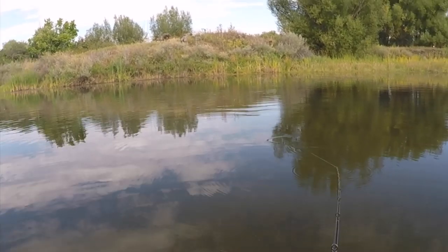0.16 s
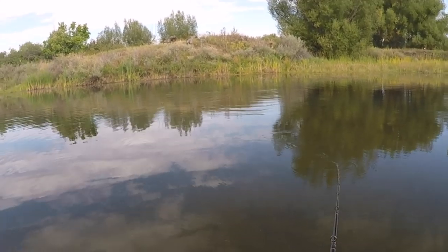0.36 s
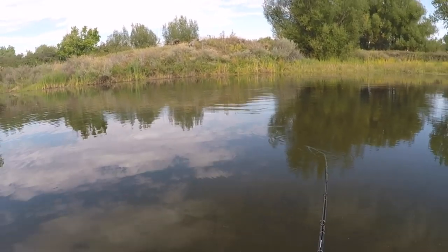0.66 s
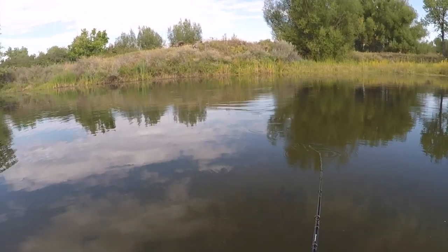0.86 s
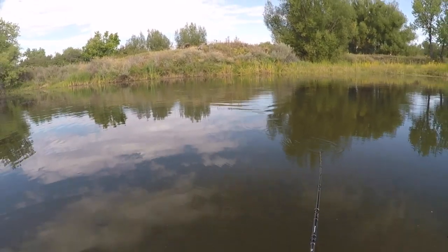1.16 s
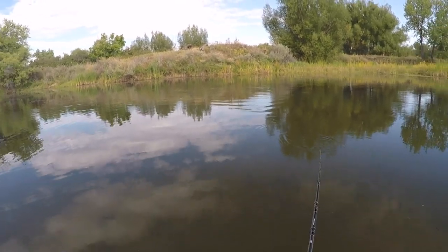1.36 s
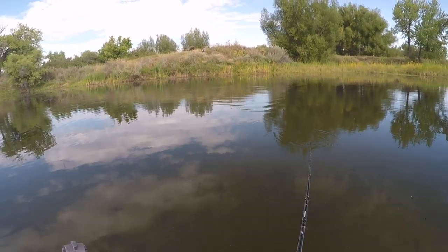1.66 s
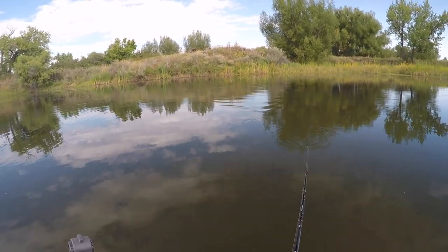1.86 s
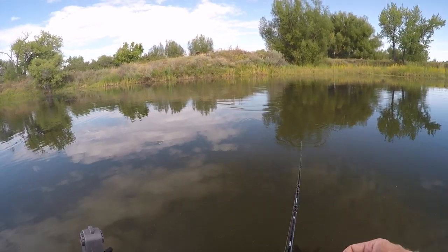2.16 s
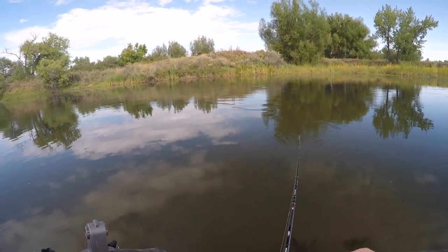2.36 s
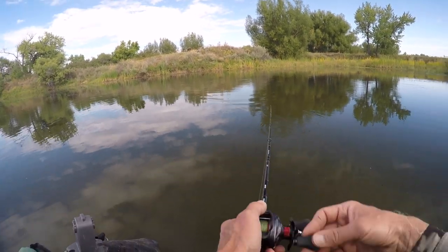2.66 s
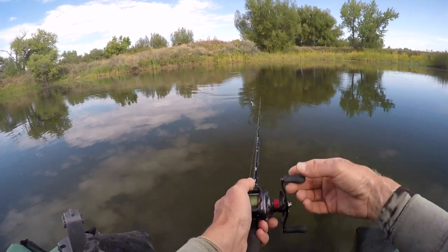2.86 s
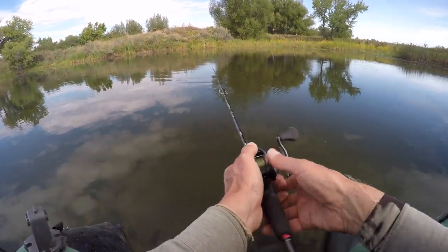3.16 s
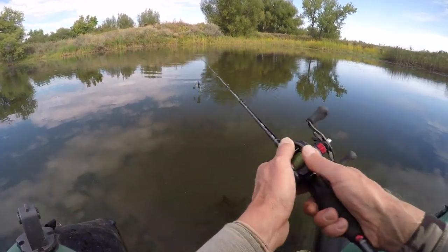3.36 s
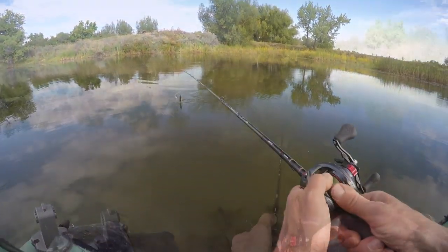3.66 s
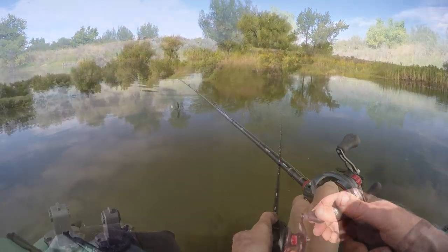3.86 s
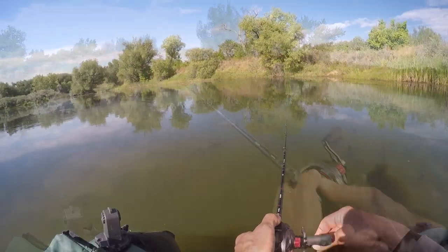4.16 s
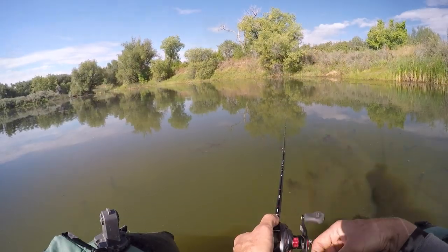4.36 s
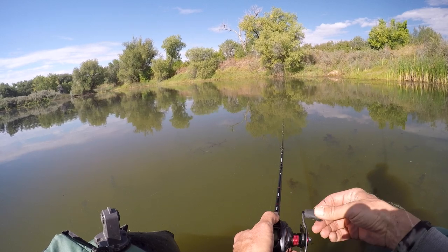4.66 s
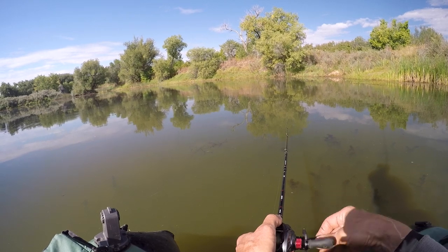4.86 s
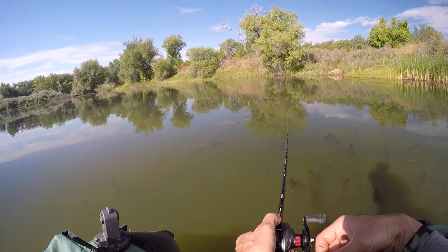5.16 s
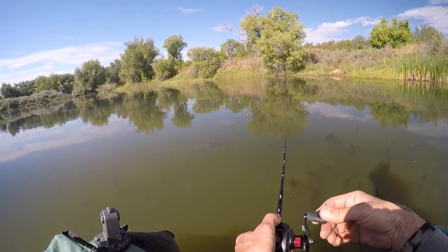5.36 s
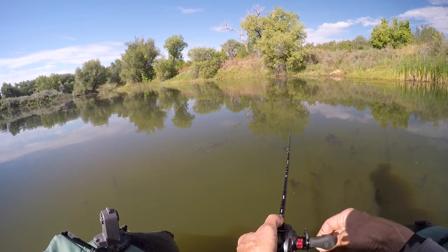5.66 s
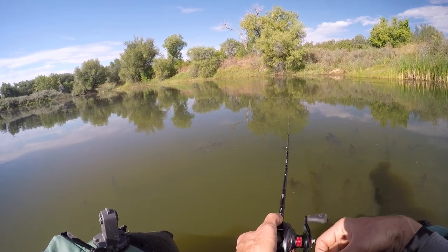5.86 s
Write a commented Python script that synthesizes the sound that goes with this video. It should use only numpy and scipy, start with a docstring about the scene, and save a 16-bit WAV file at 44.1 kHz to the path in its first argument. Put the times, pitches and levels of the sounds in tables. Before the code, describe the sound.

Close on a small boat on an open pond, an electric motor hums low and steady, with uneven buzzing rattles from the hull and loose fittings. A thin squeak sags in pitch near the start. After four seconds the motor stops abruptly, leaving soft low air and water noise, light hiss, and a fishing reel turned in gentle pushes with small scrapes, ticks and dull bumps.

```python
"""A small electric boat motor hums through the hull on a pond: a wavering harmonic tone, under resonant
rattles struck in the same limping pattern every shaft turn. A thin squeak sags in pitch near the start.
At four seconds the hum stops dead, leaving filtered noise as air and water, a faint drone and hiss.
A fishing reel is then cranked in pushes of gear noise, with soft sine bumps, light scrapes and ticks."""
import sys
import numpy as np
from scipy import signal
from scipy.fft import rfft, irfft
from scipy.io import wavfile
from scipy.ndimage import map_coordinates

SR = 44100
rng = np.random.default_rng(int(sys.argv[2]) if len(sys.argv) > 2 else 0)


def inscribe(sig):
    """Save sig as 16-bit PCM at rate SR to the path in sys.argv[1].

    A 1-D sig is mono; a 2-D sig holds one channel per row.
    Samples are clipped to [-1, 1] before scaling.
    """
    pcm = np.round(np.clip(np.atleast_2d(sig).T, -1, 1) * 32767)
    wavfile.write(sys.argv[1], SR, pcm.astype(np.int16))


N = 265041
T = np.arange(N) / SR
STOP_S = 4.003  # the motor ends
BEAT_HZ, BEATS_PER_TURN = 81.745, 4  # settled beat rate of the motor


def amp(db):
    """Decibels to gain."""
    return 10 ** (np.asarray(db) / 20)


def unit(x):
    """Scales to rms 1."""
    return x / np.sqrt(np.mean(x ** 2) + 1e-20)


def curve(rows):
    """Points (time_s, value) joined by straight lines."""
    return np.interp(T, *np.transpose(rows))


def ramp(start_s, length_s):
    """A straight rise from 0 to 1."""
    return np.clip((T - start_s) / length_s, 0, 1)


def bell(centre_s, width_s):
    """A smooth swell of height 1."""
    return np.exp(-((T - centre_s) / width_s) ** 2)


def noise(spectrum):
    """Noise of rms 1 shaped by a spectrum of (freq_hz, relative_db)."""
    freq_hz, level_db = np.transpose(spectrum)
    bins_hz = np.fft.rfftfreq(N, 1 / SR)
    shape_db = np.interp(np.log(bins_hz + 1), np.log(freq_hz), level_db)
    return unit(irfft(rfft(rng.standard_normal(N)) * amp(shape_db), N))


def wander(per_s):
    """Smooth random curve of rms 1 through per_s random points a second."""
    return unit(map_coordinates(rng.standard_normal(4000), [T * per_s], order=3, mode="mirror"))


def beating(per_s):
    """Smooth random curve that stays within -1 to 1."""
    return np.sin(wander(per_s))


def ring(x, centre_hz, width_hz):
    """One broad resonance with steep skirts."""
    edges_hz = np.clip([centre_hz - width_hz / 2, centre_hz + width_hz / 2], 10, SR / 2.1)
    return signal.sosfilt(signal.butter(2, edges_hz, "bandpass", fs=SR, output="sos"), x)


def body(x, modes):
    """The sum of several resonances, at rms 1."""
    return unit(sum(amp(db) * ring(x, centre_hz, width_hz) for centre_hz, width_hz, db in modes))


# microphone hiss spectrum: freq_hz [Hz], relative_db [dB per Hz]
HISS_SPECTRUM = [(500, -1), (3000, -2), (4800, 2.5), (5450, 4), (6000, -0.5), (9000, -0.5), (10900, -1),
                 (11150, 3), (11400, -1.5), (15000, -3)]
HISS_LOW_DB, HISS_HIGH_DB, HISS_RISE_AT_S, HISS_RISE_S = -77.5, -65.5, 3.6, 0.77


def hiss():
    """Microphone hiss: shaped noise fading from a low level to a higher one around the stop."""
    up = ramp(HISS_RISE_AT_S, HISS_RISE_S)
    level = np.hypot((1 - up) * amp(HISS_LOW_DB), up * amp(HISS_HIGH_DB))
    return level * noise(HISS_SPECTRUM)


# spectrum of air on the microphone: freq_hz [Hz], relative_db [dB per Hz]
AIR_SPECTRUM = [(8, -28), (20, -11.5), (40, -3.5), (60, -8.5), (85, -9.5), (120, -29), (300, -71),
                (900, -88)]
# air against its steady level: time_s [s], offset_db [dB]
AIR_OFFSET = [(4.0, -10), (4.1, -8.5), (4.17, -3), (4.4, -1.5), (4.6, 2), (4.9, -1), (5.15, 1), (5.4, 0.5),
              (5.48, -5), (5.6, -0.5), (6.0, 0)]
AIR_STEADY_DB = -40.5


def air(gustiness_db=2, gusts_per_s=9):
    """Air buffets the microphone: low noise of randomly swaying level."""
    level_db = AIR_STEADY_DB + curve(AIR_OFFSET) + gustiness_db * wander(gusts_per_s)
    return amp(level_db) * noise(AIR_SPECTRUM)


# spectrum of low sloshing: freq_hz [Hz], relative_db [dB per Hz]
SLOSH_SPECTRUM = [(40, -29), (80, -4), (100, 1), (120, 1), (165, -2), (215, -8), (280, -20), (400, -34),
                  (900, -54.5)]
# spectrum of water washing along the hull: freq_hz [Hz], relative_db [dB per Hz]
WASH_SPECTRUM = [(140, -8), (260, -2), (340, -1.5), (420, -7), (530, -10.5), (650, -11), (850, -14.5),
                 (1050, -19.5), (1350, -27), (2200, -33), (3500, -37), (7000, -53)]
SLOSH_DB, WASH_DB = -45.5, -49.5  # after the lull
SWELL_AT_S, SWELL_WIDTH_S, SWELL_DB = 4.78, 0.29, 5


def water():
    """Two bands of noise: sloshing with one broad swell, and a steady wash."""
    slosh_db = SLOSH_DB + SWELL_DB * bell(SWELL_AT_S, SWELL_WIDTH_S)
    return amp(slosh_db) * noise(SLOSH_SPECTRUM) + amp(WASH_DB) * noise(WASH_SPECTRUM)


DRONE_HZ, DRONE_DB, DRONE_WAVER_DB = 323.7, -60, 6


def drone(pitch_waver_hz=2.12):
    """A faint sine that wavers in pitch and level."""
    pitch_hz = DRONE_HZ + pitch_waver_hz * wander(10)
    level = amp(DRONE_DB + DRONE_WAVER_DB * beating(6))
    return level * np.sqrt(2) * np.sin(2 * np.pi * np.cumsum(pitch_hz) / SR)


LULL_DB, WATER_RISE_S = -6.5, 0.27


def drifting():
    """Air, water and drone round the idle boat; water and drone are calm just after the stop."""
    lull = amp(LULL_DB * (1 - ramp(STOP_S, WATER_RISE_S)))
    return air() + lull * (water() + drone())


# soft low bumps against the boat: peak_s [s], pitch_hz [Hz], level_db [dB]
BUMP_ROWS = [(4.611, 101, -33), (4.927, 55.5, -35), (5.405, 87, -34)]
BUMP_WIDTH_S = 0.0074


def bumps():
    """Each bump rocks the hull for a cycle or two: a sine under a short bell."""
    out = np.zeros(N)
    for peak_s, pitch_hz, level_db in BUMP_ROWS:
        out += amp(level_db) * bell(peak_s, BUMP_WIDTH_S) * np.sin(2 * np.pi * pitch_hz * (T - peak_s))
    return np.sqrt(2) * out


# scrapes of the reel, some at several pitches at once:
# centre_s [s], length_s [s], pitch_hz [Hz], width_hz [Hz], level_db [dB]
SCRAPE_ROWS = [(4.225, .07, 1840, 190, -66.5), (4.62, .04, 1580, 180, -64), (4.635, .07, 2080, 200, -64),
               (5.275, .08, 2070, 250, -67), (5.012, .036, 3600, 750, -56.5), (5.006, .046, 2900, 450, -60),
               (4.999, .03, 4100, 450, -63.5), (5.337, .032, 2550, 750, -56.5),
               (5.339, .034, 3900, 450, -60), (5.66, .07, 1870, 150, -65.5),
               (5.862, .045, 1620, 190, -62.5), (5.88, .14, 3020, 200, -71)]
# light ticks of the tackle: start_s [s], level_db [dB]
TICK_ROWS = [(4.806, -68), (5.149, -67), (5.553, -66), (5.797, -66), (5.945, -67)]


def tackle(tick_s=0.014, tick_hz=9500, tick_width_hz=9000, grain=0.22):
    """Short scrapes of grainy noise through a resonance; dry ticks of decaying bright noise."""
    out = np.zeros(N)
    rub = rng.standard_normal(N) * np.exp(grain * wander(300))
    for centre_s, length_s, pitch_hz, width_hz, level_db in SCRAPE_ROWS:
        stroke = np.cos(np.pi * np.clip((T - centre_s) / length_s, -.5, .5))
        out += amp(level_db) * stroke * unit(ring(rub, pitch_hz, width_hz))
    snap = unit(ring(rng.standard_normal(N), tick_hz, tick_width_hz))
    for start_s, level_db in TICK_ROWS:
        out += amp(level_db) * (T >= start_s) * np.exp(-abs(T - start_s) / tick_s) * snap
    return out


# resonances of the reel's housing: centre_hz [Hz], width_hz [Hz], relative_db [dB]
HOUSING_MODES = [(1582, 360, 2.5), (1786, 110, 3.5), (1977, 230, 2), (1450, 700, 2.5), (2760, 460, -2)]
# pushes on the crank: peak_s [s], level_db [dB]
CRANK_PUSHES = [(4.305, -64), (4.61, -60), (4.94, -64.5), (5.295, -59), (5.56, -66.5), (5.87, -63.5)]
PUSH_WIDTH_S, COAST_DB = 0.097, -82  # the gears whisper between pushes


def reel(rub_share=1.46, grain=0.15, catches_per_s=260):
    """Gear teeth rub (noise) and catch (random clicks), ringing the housing with each push."""
    caught = rng.random(N) < catches_per_s / SR
    catches = caught * rng.choice([-1, 1], N) * np.exp(grain * rng.standard_normal(N))
    teeth = unit(catches) + rub_share * rng.standard_normal(N)
    pushes = sum(amp(level_db) * bell(peak_s, PUSH_WIDTH_S) for peak_s, level_db in CRANK_PUSHES)
    return (amp(COAST_DB) + pushes) * body(teeth, HOUSING_MODES)


# partials of the squeak: multiple [of its pitch], relative_db [dB]
SQUEAK_TONES = [(3, -2.5), (4, 0), (5, -15), (6, -18)]
SQUEAK_AT_S, SQUEAK_LENGTH_S, SQUEAK_EDGE_S, SQUEAK_BREAK_S = .23, .27, .03, .3
SQUEAK_HZ, SQUEAK_SAG_HZ_PER_S2 = 779, 1000
SQUEAK_DB, SQUEAK_FADE_DB_PER_S = -69, 64


def squeak(quiver_hz=4, flicker_db=2.8):
    """A thin tone that sags in pitch, fades and breaks up; each partial flickers on its own."""
    age_s = np.clip(T - SQUEAK_AT_S, 0, SQUEAK_LENGTH_S)
    broken = 1 + age_s / SQUEAK_BREAK_S  # quiver and flicker grow
    pitch_hz = SQUEAK_HZ - SQUEAK_SAG_HZ_PER_S2 * age_s ** 2 + quiver_hz * broken * wander(240)
    angle = 2 * np.pi * np.cumsum(pitch_hz) / SR
    edges = np.minimum(np.minimum(age_s, SQUEAK_LENGTH_S - age_s) / SQUEAK_EDGE_S, 1)
    level = edges * amp(SQUEAK_DB - SQUEAK_FADE_DB_PER_S * age_s)
    tone = np.zeros(N)
    for multiple, db in SQUEAK_TONES:
        tone += amp(db + flicker_db * broken * (beating(70) + 0.2)) * np.sin(multiple * angle)
    return level * np.sqrt(2) * tone


# the knocks of one shaft turn: place_beats [beats], low_db [dB, hull and panel],
# high_db [dB, mount and clamp], direction [side to which the panel is thrown, +1 or -1]
TURN_KNOCKS = [(0.68, 0, -2, 1), (1.69, -3.5, -0.5, -1), (2.715, -1, 1.5, 1), (3.685, -3, -1, 1)]
# moments of harder knocking: peak_s [s], extra_low_db [dB, hull and panel], extra_high_db [dB, mount and clamp]
HARD_MOMENTS = [(.084, 5, 0), (.230, 3.5, 0), (.887, 2, 2), (.960, 0, 4), (.984, 3, 0), (1.082, 5, 0),
                (1.131, 2.5, 0), (1.180, 3.5, 0), (1.206, 3, 0), (1.218, 0, 4), (1.256, 2, 3),
                (1.425, 2.5, 0), (1.620, 3, 0), (1.669, 2.5, 0), (1.718, 2.5, 0), (1.780, 0, 4),
                (1.793, 2, 1), (1.951, 0, 5), (2.109, 3.5, 0), (2.159, 2, 0), (2.379, 0, 3),
                (2.527, 2.5, 0), (2.991, 3, 1), (3.089, 3, 0), (3.359, 1, 4), (3.627, 2, 0), (3.726, 2, 0),
                (3.774, 3.5, 0), (3.835, 0, 5), (3.848, 0, 4), (3.897, 3, 2), (3.946, 2, 0)]
HARD_WIDTH_S = .0032


def knocks(beats, jitter_s=.00004, uneven_db=1.0):
    """A click of uneven force each time the shaft passes a knocking place: on hull, panel, loose parts."""
    low, side, high = np.zeros((3, N))
    for place_beats, low_db, high_db, direction in TURN_KNOCKS:
        at = np.flatnonzero(np.diff(np.floor((beats - place_beats) / BEATS_PER_TURN)) > 0)
        slip, force, bite = rng.standard_normal(size=(200, 3))[:len(at)].T
        at = np.clip(at + np.round(jitter_s * SR * slip).astype(int), 0, N - 1)
        low[at] = amp(low_db + uneven_db * np.tanh(force))
        side[at] = direction
        high[at] = amp(high_db + uneven_db * np.tanh(bite))
    extra_db = sum(np.outer(extra, bell(peak_s, HARD_WIDTH_S)) for peak_s, *extra in HARD_MOMENTS)
    hard_low, hard_high = amp(extra_db)
    return unit(low * hard_low), unit(low * hard_low * side), unit(high * hard_high)


def roughness(beats, repeating=.4):
    """Rubbing surfaces: the same bumps come round every shaft turn, mixed with fresh noise."""
    surface = rng.standard_normal(size=2150)
    place = (beats / BEATS_PER_TURN * len(surface)).astype(int) % len(surface)
    return np.sqrt(repeating) * surface[place] + np.sqrt(1 - repeating) * rng.standard_normal(N)


def chatter(blows, beats, rise_s, floor):
    """Rubbing that swells just after each knock and falls to a constant floor before the next."""
    age = np.arange(SR // 40) / SR / rise_s
    burst = signal.oaconvolve(abs(blows), age ** 2 * np.exp(-2 * age))[:N]
    return unit((floor + unit(burst)) * roughness(beats))


# resonances of the rattling parts: centre_hz [Hz], width_hz [Hz], relative_db [dB]
HULL_MODES = [(653, 200, 0), (717, 250, -12.5)]
# the same columns, panel
PANEL_MODES = [(1038, 88, 11), (1107, 82, 4.8)]
# the same columns, mount
MOUNT_MODES = [(1702, 270, 1), (1800, 410, -7)]
# the same columns, clamp
CLAMP_MODES = [(2220, 190, 4), (2500, 160, 0.5), (2970, 150, -5)]
# level of the hull's thudding: time_s [s], level_db [dB]
HULL_LEVEL = [(0.0, -60.5), (0.35, -60), (0.68, -70.5), (1.07, -58), (1.45, -63), (1.9, -62.5), (2.6, -64),
              (3.4, -56.5), (3.6, -61), (3.98, -55.5)]
# level of the panel's rattle: time_s [s], level_db [dB]
PANEL_LEVEL = [(0.0, -65.5), (0.28, -60.5), (0.75, -70), (1.02, -62), (1.22, -59.5), (1.42, -68.5),
               (1.89, -62), (2.75, -73), (3.45, -63), (3.66, -71.5), (3.98, -63.5)]
# level of the mount's buzz: time_s [s], level_db [dB]
MOUNT_LEVEL = [(0.0, -71.5), (0.24, -65.5), (0.42, -69.5), (0.85, -69), (1.2, -64), (1.32, -70.5),
               (1.5, -67), (2.05, -63), (2.22, -71), (2.42, -63.5), (2.719, -73.5), (3.1, -64),
               (3.25, -65.5), (3.441, -59.5), (3.66, -66.5), (3.98, -61)]
# level of the clamp's surging buzz: time_s [s], level_db [dB]
CLAMP_LEVEL = [(0.0, -83), (0.4, -74.5), (0.8, -73.5), (0.959, -70.5), (1.15, -75), (1.38, -76.5),
               (1.56, -68.5), (1.801, -73), (1.96, -66.5), (2.12, -79.5), (2.36, -72.5), (2.55, -79),
               (2.98, -80.5), (3.1, -69.5), (3.25, -75), (3.459, -63.5), (3.67, -73), (3.98, -68.5)]


def rattle(beats, slap_share=0.42, hull_chatter=.65, panel_chatter=.75):
    """Each knock shoves the hull, throws the panel and sets the loose mount and clamp buzzing."""
    shoves, throws, jolts = knocks(beats)
    rub = chatter(shoves, beats, rise_s=.001, floor=.25)
    slaps = jolts * rng.choice([-1, 1], N)
    buzz = chatter(jolts, beats, rise_s=.0014, floor=.5) + slap_share * slaps
    hull = amp(curve(HULL_LEVEL)) * body(hull_chatter * rub - shoves, HULL_MODES)
    panel = amp(curve(PANEL_LEVEL)) * body(throws + panel_chatter * rub, PANEL_MODES)
    mount = amp(curve(MOUNT_LEVEL)) * body(buzz, MOUNT_MODES)
    clamp = amp(curve(CLAMP_LEVEL)) * body(buzz, CLAMP_MODES)
    return hull + panel + mount + clamp


# level of the hum: time_s [s], level_db [dB]
HUM_LEVEL = [(0.0, -30), (0.3, -30), (0.65, -29.5), (1.2, -29.5), (1.6, -28.5), (2.55, -28.5), (2.75, -29),
             (3.0, -28), (3.33, -29.5), (3.98, -28.5)]
# partials of the hum; fractional multiples come from the shaft's imbalance:
# multiple [of the beat rate], relative_db [dB at 0 s], growth_db_per_s [dB/s], waver_db [dB]
HUM_PARTIALS = [(1, 0, 0, 0.2), (2, -10.5, 0.63, 1.5), (3, -25.5, 1.3, 4.5), (4, -24, -0.24, 3),
                (5, -28, 0.86, 4.5), (6, -30.5, 0, 2), (7, -33.5, -0.5, 2), (8, -44, 1.5, 2),
                (1.25, -38, 1, 5), (1.75, -35, -0.5, 4.5), (2.25, -42, -0.5, 1.5), (2.75, -33.5, -2.5, 3),
                (4.25, -45, 0.5, 6.5), (5.25, -47.5, 0.5, 5.5), (3.5, -47, -3, 2), (8.25, -42.5, 0.5, 3),
                (8.75, -41.5, 1, 2), (9.25, -47, -1, 2.5), (14.25, -50, -0.5, 3.5), (18.5, -52, 0.5, 2)]


def hum(beats, wavers_per_s=10, lead_beats=.095, hull_hz=290):
    """A rounded sawtooth: the force on the hull builds slowly and lets go once a beat."""
    angle = 2 * np.pi * beats
    early = angle + 2 * np.pi * (lead_beats - 1)
    out = np.zeros(N)
    for multiple, db, growth_db_per_s, waver_db in HUM_PARTIALS:
        # above the hull's first resonance the partials keep step with the knocks
        phase = angle if multiple * BEAT_HZ < hull_hz else early
        level_db = db + growth_db_per_s * T + waver_db * beating(wavers_per_s)
        out -= amp(level_db) * np.sin(multiple * phase)
    return np.sqrt(2) * amp(curve(HUM_LEVEL)) * out


# spectrum of water along the moving hull: freq_hz [Hz], relative_db [dB per Hz]
WAKE_SPECTRUM = [(10, -15.5), (25, -4.5), (55, 1), (130, -5.5), (200, -11), (280, -15.5), (500, -18.5),
                 (1000, -24), (1400, -34), (3000, -45), (6000, -67)]
WAKE_DB = -48
START_EXTRA_HZ, SETTLE_S = .5, .9  # starts a little fast


def motor(flutter_beats=0.0044, drift_beats=0.0069, stop_s=0.011):
    """Hum and rattle driven by one unsteady shaft, plus noise as wake, all ending together."""
    beat_hz = BEAT_HZ + START_EXTRA_HZ * (1 - ramp(0, SETTLE_S))
    beats = np.cumsum(beat_hz) / SR + flutter_beats * wander(30) + drift_beats * wander(5.6)
    running = np.clip((STOP_S - T) / stop_s + .5, 0, 1)
    return running * (hum(beats) + rattle(beats) + amp(WAKE_DB) * noise(WAKE_SPECTRUM))


def scene():
    """Motor first, then the quiet boat and the reel, over the microphone's hiss."""
    after_stop = (T > STOP_S) * (drifting() + bumps() + reel())
    return (hiss() + after_stop + tackle() + squeak() + motor())[None]


def record(dry, edge_hz=15500, fade_s=.006):
    """Soft edges, then a steep low-pass at edge_hz."""
    fade = np.clip(np.minimum(T, T[-1] - T) / fade_s, 0, 1)
    eased = dry * np.sin(np.pi / 2 * fade) ** 2
    lowpass = signal.firwin(511, edge_hz, window=("kaiser", 9), fs=SR)
    return signal.oaconvolve(eased, lowpass[None], "same")


dry = scene()
out = record(dry)
inscribe(out)
```